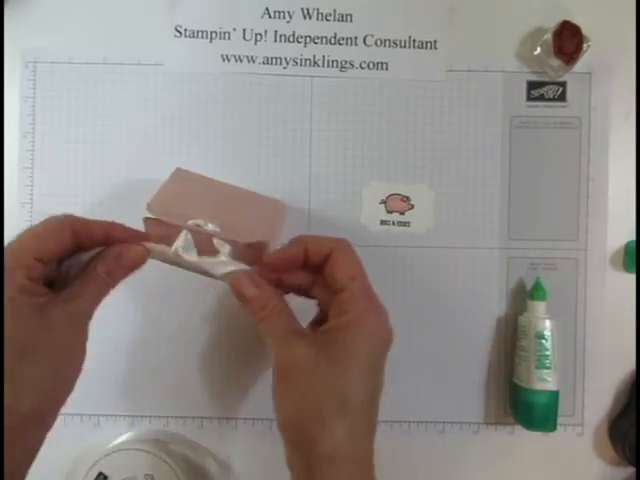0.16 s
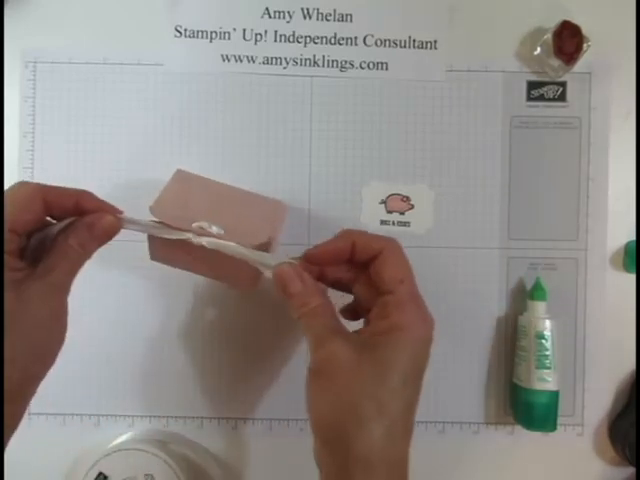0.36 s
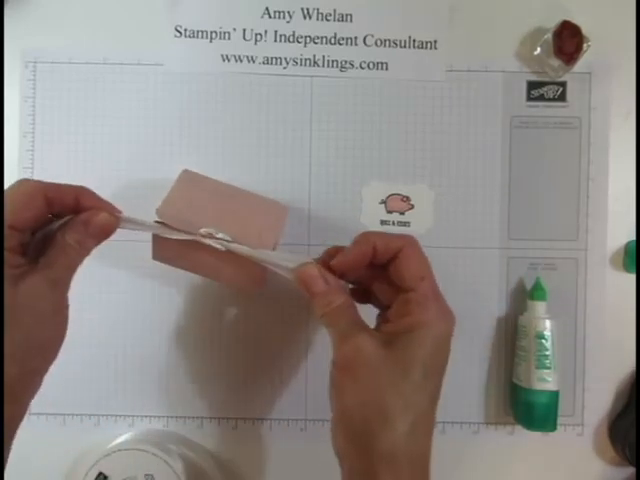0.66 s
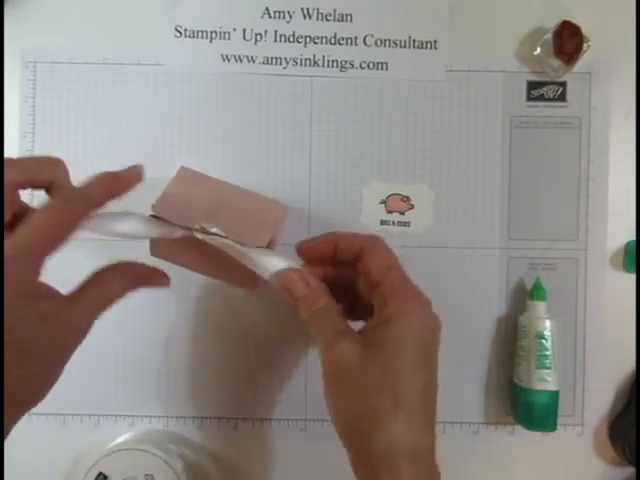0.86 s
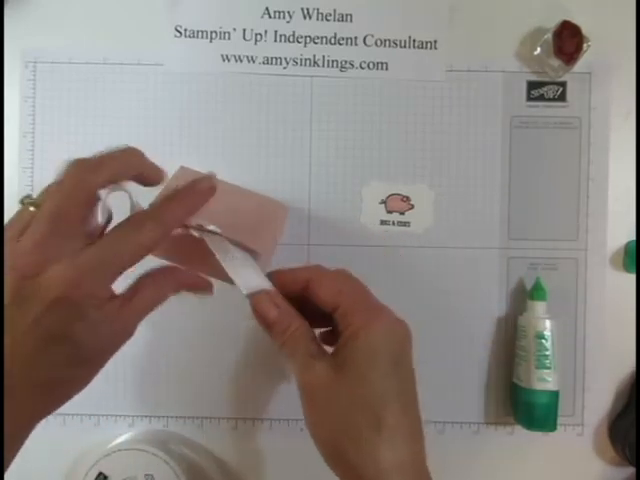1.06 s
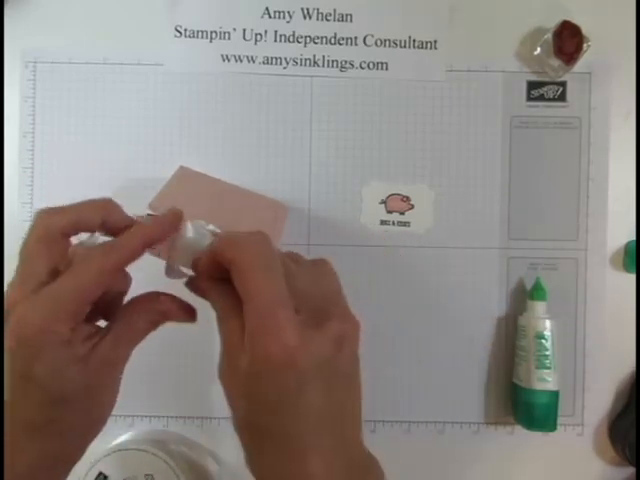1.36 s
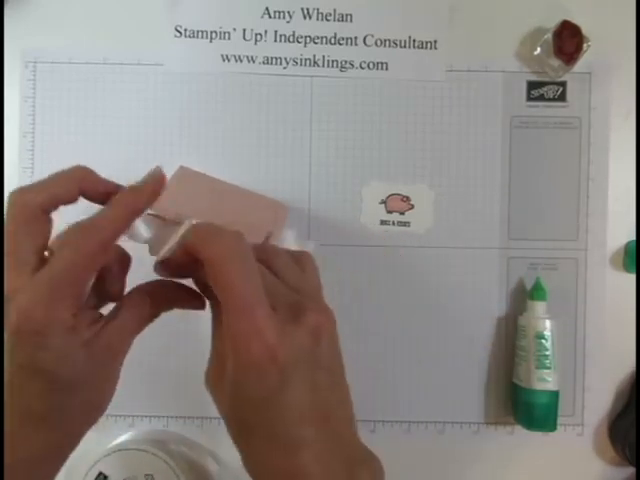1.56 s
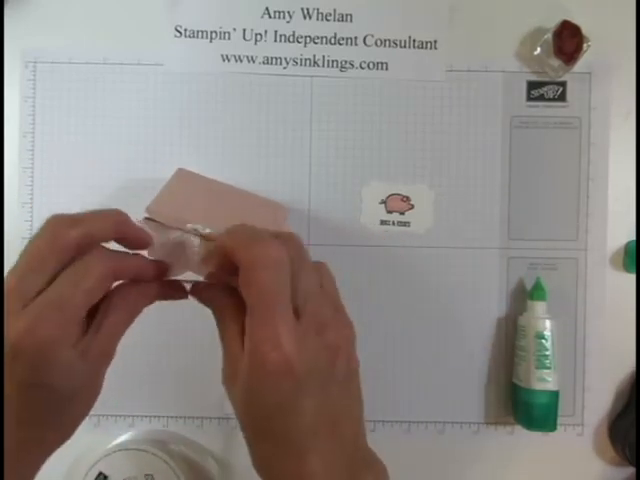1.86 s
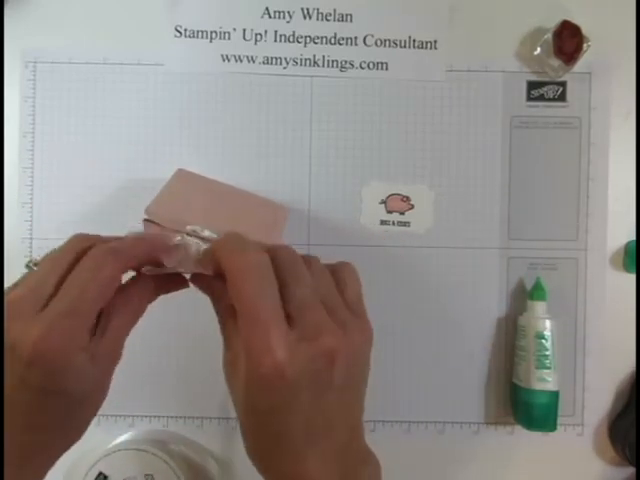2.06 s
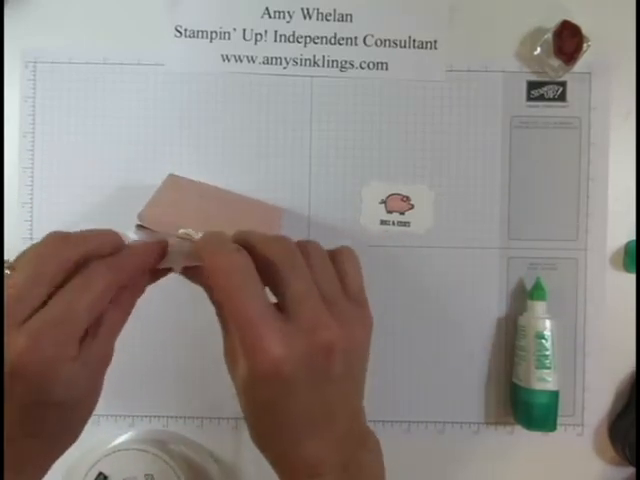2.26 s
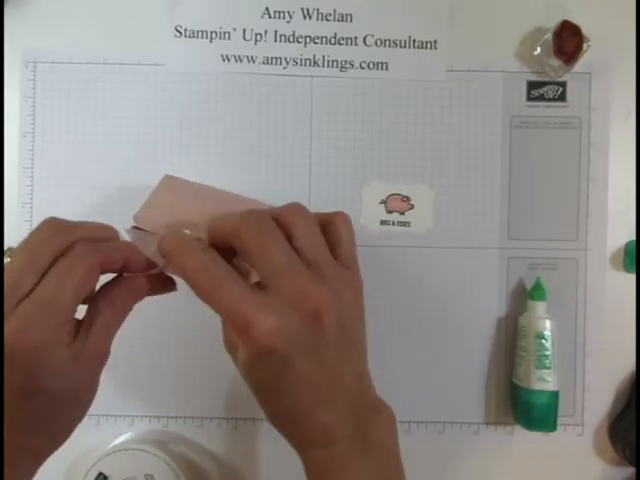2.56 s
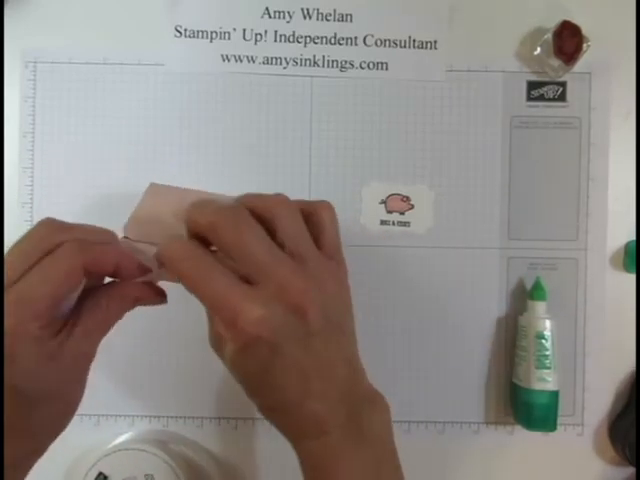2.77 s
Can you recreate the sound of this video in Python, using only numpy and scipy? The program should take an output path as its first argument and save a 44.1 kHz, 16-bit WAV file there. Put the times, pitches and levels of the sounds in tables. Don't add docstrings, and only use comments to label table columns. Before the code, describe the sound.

Ribbon rustling on a hollow cardstock box, soft scrapes and papery knocks, in a humming quiet room.

```python
import sys
import numpy as np
from scipy import signal
from scipy.fft import rfft, irfft
from scipy.io import wavfile
from scipy.ndimage import uniform_filter1d

SR = 44100
rng = np.random.default_rng(int(sys.argv[2]) if len(sys.argv) > 2 else 0)


def to_linear_factor(level_db):
    exponent = np.asarray(level_db, float) / 20
    return 10 ** exponent


def generate_wav(sig):
    pcm = np.round(np.clip(np.atleast_2d(sig).T, -1, 1) * 32767).astype(np.int16)
    wavfile.write(sys.argv[1], SR, pcm)


N = 127890

# (start [s], length [s], level [dB], brightness [Hz], share of length spent rising [0-1])
SATIN_SLIDES = [(0.113, 0.22, -45.5, 6900, 0.08), (0.161, 0.33, -52, 8800, 0.45),
                (0.372, 0.098, -41.5, 7000, 0.8), (0.572, 0.023, -61, 9000, 0.4),
                (0.66, 0.038, -47, 7340, 0.7), (0.768, 0.049, -48, 8000, 0.1),
                (0.833, 0.087, -34.5, 8550, 0.19), (0.906, 0.053, -52.5, 7900, 0.6),
                (1.011, 0.046, -55, 8000, 0.8), (1.077, 0.22, -60, 8000, 0.5),
                (1.237, 0.25, -54.5, 7400, 0.34), (1.317, 0.093, -47, 9000, 0.61),
                (1.562, 0.089, -55, 9000, 0.54), (1.642, 0.066, -56, 9000, 0.54),
                (1.744, 0.043, -51, 9500, 0.6), (2.036, 0.049, -49.5, 9500, 1),
                (2.111, 0.045, -55, 9000, 0.65), (2.297, 0.067, -39, 7000, 0.82),
                (2.532, 0.027, -43.5, 8300, 0.86), (2.608, 0.056, -57, 5950, 0.2),
                (2.664, 0.19, -49.5, 6740, 0.13), (2.724, 0.071, -51, 7000, 0.24),
                (2.763, 0.13, -44.5, 6100, 0.17), (2.866, .06, -48, 6200, 0.7)]
# (start [s], length [s], level [dB], centre [Hz], share of length spent rising [0-1])
CARD_SCRAPES = [(0.093, 0.29, -43.5, 4400, 0), (0.218, 0.29, -41, 3350, 0.3),
                (0.389, 0.16, -38.5, 3200, 0.34), (0.653, 0.082, -43.5, 1780, 0.43),
                (0.766, 0.13, -44.5, 2150, 0.03), (0.839, 0.044, -29, 4300, 0.15),
                (.84, 0.047, -40, 960, 0), (0.914, 0.03, -44, 2230, 0.8), (0.987, 0.028, -41, 3820, 0.67),
                (1.081, 0.015, -37, 3500, 0), (1.09, 0.026, -42.5, 1580, 0.32),
                (1.319, 0.068, -43.5, 2060, 0.13), (1.738, 0.027, -48.5, 2480, 0.84),
                (2.3212, 0.022, -28.5, 2400, 1), (2.319, 0.02, -32, 2500, 0),
                (2.317, .04, -40.5, 715, 0.76), (2.34, 0.043, -34.5, 1510, 0),
                (2.536, 0.023, -35.5, 3084, 0.7), (2.611, 0.11, -44.5, 860, 0.18),
                (2.616, 0.039, -39.5, 3320, 0.26), (2.668, 0.079, -46, 1370, 0),
                (2.717, 0.038, -39, 1740, 0.5), (2.763, 0.11, -39.5, 2370, 0.18),
                (2.827, 0.051, -54, 840, 0.7), (2.867, 0.044, -43.5, 2960, 0.63)]
# (time [s], level [dB], centre [Hz], width [octaves])
CARD_TICKS = [(.1884, -41, 4840, 1.7), (0.4664, -37.5, 9000, 0.85), (.5197, -47, 3480, 2.9),
              (0.5856, -44, 9000, 2.4), (.7712, -44.5, 2480, 0.29), (.7795, -44.5, 7000, 0.91),
              (0.8205, -43, 5050, 0.49), (0.8372, -28, 4470, 0.67), (0.8456, -30.5, 9700, 0.25),
              (0.8528, -35.5, 4800, 0.73), (.9996, -50, 3970, 0.25), (1.0002, -50, 2220, 0.2),
              (1.0822, -48, 2690, 1.6), (1.0965, -48, 674, 0.55), (1.098, -39, 6800, 1.1),
              (1.5978, -46, 9000, 1.5), (1.7435, -44.5, 9000, 0.19), (2.3048, -35.5, 870, 2.4),
              (.8255, -43, 5030, 0.87), (2.306, -40, 2950, 0.97), (2.3215, -39, 7460, 0.76),
              (2.3402, -34.5, 2700, 0.22), (2.3435, -30, 7050, 0.41), (2.4613, -45, 587, 3.6),
              (2.4615, -44.5, 3800, 1), (2.6145, -45.5, 480, 1), (2.7232, -43, 4000, 2.1),
              (2.803, -31.5, 816, 0.83), (2.8026, -24.5, 7500, 0.85), (2.8078, -24, 2230, 2.2),
              (2.811, -35, 1190, 0.98), (.3911, -57, 5000, 1.6), (.6705, -45, 4000, 1.3),
              (.8345, -46, 11000, 0.89), (.8805, -45, 5000, 1), (1.262, -47.5, 6000, 1.5),
              (2.773, -44, 3500, 0.8), (2.676, -47, 3000, 0.94), (.8405, -42, 3750, 0.98),
              (.8565, -49, 4300, 0.82), (.312, -46, 4230, 0.55), (2.5403, -41.5, 4000, 1.8),
              (2.6138, -50, 2500, 1.5), (.9985, -47, 3020, 1.7), (2.8085, -30.5, 3900, .5),
              (1.104, -45.5, 3000, 2.2)]
# (time [s], peak level [dB], frequency [Hz], t60 [s], rise [s])
PANEL_RINGS = [(1.096, -45, 684, 0.056, .003), (2.3045, -25, 930, 0.028, .0015),
               (2.3045, -25.5, 495, 0.026, 0.0027), (2.306, -31, 247, 0.037, 0.0023),
               (2.32, -32.5, 412, 0.085, 0.0071), (2.335, -34, 1213, 0.04, 0.0051),
               (2.337, -35, 2710, 0.044, 0.0077), (2.357, -38, 1140, .05, .004),
               (2.62, -42.5, 672, .08, 0.0049), (2.644, -37, 1290, 0.033, 0.0023),
               (2.676, -46, 1330, .05, .002), (2.728, -40, 475, 0.054, 0.0091),
               (2.736, -43, 1320, 0.056, 0.0022), (2.775, -41, 1300, .04, .002),
               (2.786, -39, 1264, .05, 0.0048), (2.8022, -28, 632, 0.077, .002),
               (2.8027, -26, 940, 0.029, 0.0019), (2.81, -29.5, 1280, 0.036, 0.01),
               (2.803, -35, 285, 0.038, 0.0019), (2.818, -44, 1300, .05, 0.0053),
               (2.851, -36.5, 796, 0.069, .014), (2.889, -40, 3000, 0.036, 0.0037)]
# (frequency [Hz], width [Hz], level [dB])
BOX_RESONANCES = [(264, 69, 3), (406, 35, -2), (478, 59, -10.5), (615, 52, -6.5), (800, 12, -5),
                  (965, 220, -11), (1190, 110, -3), (1324, 16, -4), (2204, 230, -10.5), (2785, 98, -8),
                  (3200, 65, -11), (3616, 94, -9.5), (4015, 150, -7), (6440, 74, -9)]
# (frequency [Hz], phase [rad])
HUM_TONES = [
    (120.0, 1.13),
    (117.95, 3.65),
    (235.9, 0),
    (52.4, 1),
    (87.0, 2),
    (174.0, 3),
    (236.42, -1.96),
]
HUM_LEVELS = [-43.1, -51.5, -60, -61, -61, -64, -64]
# (frequency [Hz], level per Hz [dB])
AIR_COLOUR = [(160, -4), (205, -9), (350, -7), (1200, -17), (3000, -21.5), (7000, -27.5), (11500, -33.5),
              (14000, -48)]
# (frequency [Hz], likeness [-1 to 1])
AIR_LIKENESS = [(60, 0.95), (130, 0.12), (280, -0.67), (610, -0.4), (1330, 0.13), (2890, 0.64),
                (6260, 0.55), (13600, -0.045)]
# (frequency [Hz], level [dB])
NEAR_WIDTH = [(300, -14), (1000, -14), (2500, -24), (6000, -8.5), (12000, -3)]
# (frequency [Hz], t60 [s])
ROOM_DECAY = [(400, 0.36), (800, 0.28), (1300, 0.21), (4000, .14), (11000, 0.18)]

CLUMP_S, CLUMP_DB = 0.002, 2.3
SLIDE_OCTAVES, SLIDE_FADE_DB, SLIDE_GRAINS_PER_S, SLIDE_SPREAD_DB = 1.0, -32, 14000, 1.5
SCRAPE_OCTAVES, SCRAPE_FADE_DB, SCRAPE_GRAINS_PER_S, SCRAPE_SPREAD_DB = 2.63, -14.5, 8000, 2.0
TICK_RISE_S, TICK_T60_S, TICK_DAMPING = 0.00031, 0.025, 0.23
BLOW_HZ = 9000
BOX_DIRECT_DB = -6
HUM_WAVER_DB, HUM_LEAD_RAD = 0.25, 0.1
AIR_DB, AIR_PATCH_DB = -43.5, 0.72
RUMBLE_DB, RUMBLE_HZ = -56.5, 80
ROOM_DB, ROOM_SIDE_DB = -8.5, -12.0
MIC_DROOP_HZ, EDGE_HZ = 12650, 13500
OPPOSED = np.array([[1], [-1]])


def evened(x):
    return x / np.sqrt(np.mean(x ** 2) + 1e-20)


def read(points, hz):
    f, value = np.transpose(points)
    return np.interp(np.log(hz + 1), np.log(f + 1), value)


def add(mix, s, sound):
    part = mix[round(s * SR):][:len(sound)]
    part += sound[:len(part)]


def bell(x, hz, octaves):
    b, a = signal.iirpeak(min(hz, SR / 3), 1 / np.clip(octaves, .2, 1.9), SR)
    return signal.lfilter(b, a, signal.lfilter(b, a, x))


def rub(row, octaves, fade_db, grains_per_s, spread_db):
    start, length, db, hz, rise = row
    u = np.arange(0, 1.5, 1 / (length * SR))
    rise = np.clip(rise, .05, .9)
    hit, size, sign, clump = rng.random((4, SR // 2))
    for _ in range(2):
        clump = uniform_filter1d(clump - .5, round(CLUMP_S * SR))
    clump = evened(clump + .5)
    catch_size = to_linear_factor(CLUMP_DB * clump - spread_db * np.log(size + 0.043))
    grains = (hit < grains_per_s / SR) * (sign - .5) * catch_size
    fade = (np.maximum(u - rise, 0) / (1 - rise)) ** 0.81
    swell = np.minimum(u / rise, 1) ** 0.51 * to_linear_factor(fade_db * fade)
    return start, to_linear_factor(db) * swell * evened(bell(grains[:len(u)], hz, octaves))


def ribbon():
    out = np.zeros(N)
    for row in SATIN_SLIDES:
        add(out, *rub(row, SLIDE_OCTAVES, SLIDE_FADE_DB, SLIDE_GRAINS_PER_S, SLIDE_SPREAD_DB))
    return out


def tick(db, hz, octaves):
    t = np.arange(600) / SR
    decay = to_linear_factor(-60 * t / TICK_T60_S * (hz / 3000) ** TICK_DAMPING)
    crackle = rng.standard_normal(len(t)) * np.minimum(t / TICK_RISE_S, 1) * decay
    blow = BLOW_HZ / hz * (t == 0)
    return to_linear_factor(db) * evened(bell(crackle - blow, hz, octaves))


def box():
    drive = np.zeros(N)
    for row in CARD_SCRAPES:
        add(drive, *rub(row, SCRAPE_OCTAVES, SCRAPE_FADE_DB, SCRAPE_GRAINS_PER_S, SCRAPE_SPREAD_DB))
    for s, db, hz, octaves in CARD_TICKS:
        add(drive, s, tick(db, hz, octaves))
    panels = np.zeros(N)
    for hz, width, db in BOX_RESONANCES:
        panels += to_linear_factor(db) * signal.lfilter(*signal.iirpeak(hz, hz / width, SR), drive)
    return to_linear_factor(BOX_DIRECT_DB) * drive + 2 * panels


def rings():
    out, t = np.zeros(N), np.arange(6000) / SR
    for s, db, hz, t60, rise in PANEL_RINGS:
        swell = np.minimum(t / rise, 1) * to_linear_factor(db - 60 * np.maximum(t - rise, 0) / t60)
        add(out, s, swell * np.sin(2 * np.pi * hz * t))
    return out


def ports(x):
    width = to_linear_factor(read(NEAR_WIDTH, np.fft.rfftfreq(N, 1 / SR)))
    side = irfft(rfft(x) * 1j * width, N)
    return np.array([x + side, x - side])


def room(x):
    taps = np.zeros((2, SR // 2))
    at = np.arange(80, SR // 2 - 20, 20)
    at = at + rng.integers(0, 20, (2, len(at)))
    np.put_along_axis(taps, at, rng.choice([-1., 1.], at.shape), 1)
    hz, t, z = signal.stft(taps, SR, nperseg=128)
    decay = to_linear_factor(-60 * t / read(ROOM_DECAY, hz)[:, None])
    tail = signal.istft(z * decay, SR, nperseg=128)[1]
    return signal.fftconvolve(x[None], tail / np.linalg.norm(tail[0]), axes=1)[:, :N]


def hum():
    t = np.arange(N) / SR
    out = np.zeros((2, N))
    for (hz, phase), db in zip(HUM_TONES, HUM_LEVELS):
        waver = np.sin(2 * np.pi * (t[:, None] * [.7, 1.9, 4.3] + rng.random(3))).sum(1)
        tone = np.cos(2 * np.pi * hz * t + phase + HUM_LEAD_RAD * OPPOSED)
        out += np.sqrt(2) * to_linear_factor(db + HUM_WAVER_DB * waver) * tone
    return out


def air():
    frames, hz = N // 256 + 5, np.fft.rfftfreq(1024, 1 / SR)
    a, b, c, d, patches = rng.standard_normal((frames, 513, 5)).T
    patches = evened(uniform_filter1d(uniform_filter1d(patches, 14, 0), 8, 1))
    same = np.clip(read(AIR_LIKENESS, hz), -.99, .99)[:, None]
    left = a + 1j * b
    right = same * left + np.sqrt(1 - same ** 2) * (c + 1j * d)
    colour = read([(60, -19.5), *AIR_COLOUR], hz)[:, None]
    z = np.array([left, right]) * to_linear_factor(colour + AIR_PATCH_DB * patches)
    hiss = evened(signal.istft(z, nperseg=1024, noverlap=768)[1][:, :N].T).T
    low = signal.lfilter(*signal.iirpeak(RUMBLE_HZ, .8, SR), rng.standard_normal((2, N)))
    low = signal.lfilter(*signal.butter(2, [28, 170], "band", fs=SR), low)
    rumble = evened(low[0] + 0.38 * low[1] * OPPOSED)
    return to_linear_factor(AIR_DB) * hiss + to_linear_factor(RUMBLE_DB) * rumble


def scene():
    near = ribbon() + box()
    wet = room(near)
    centre = ports(near + rings() + to_linear_factor(ROOM_DB) * wet[0])
    room_side = to_linear_factor(ROOM_DB + ROOM_SIDE_DB) * wet[1] * OPPOSED
    return centre + room_side + hum() + air()


def top_cut(x):
    return signal.sosfilt(signal.butter(12, 15700, fs=SR, output="sos"), x)


def record(dry):
    dull = signal.lfilter(*signal.butter(2, MIC_DROOP_HZ, fs=SR), dry)
    edge = signal.firwin(63, EDGE_HZ, window=("kaiser", 4), fs=SR)
    mix = signal.oaconvolve(dull, edge[None], "same")
    return top_cut(mix)


dry = scene()
out = record(dry)
generate_wav(out)
```